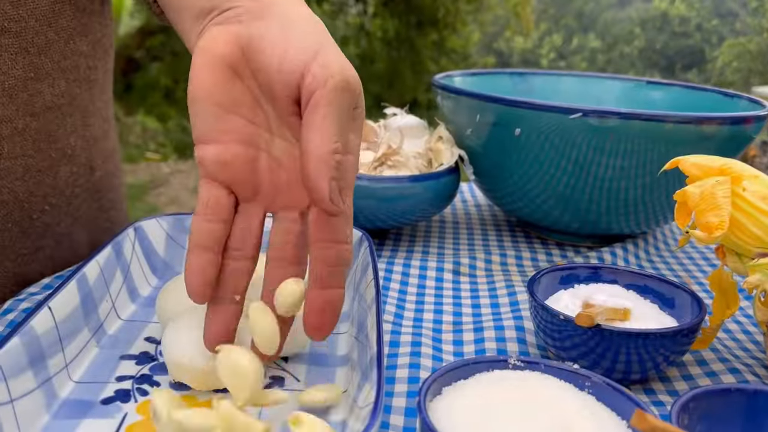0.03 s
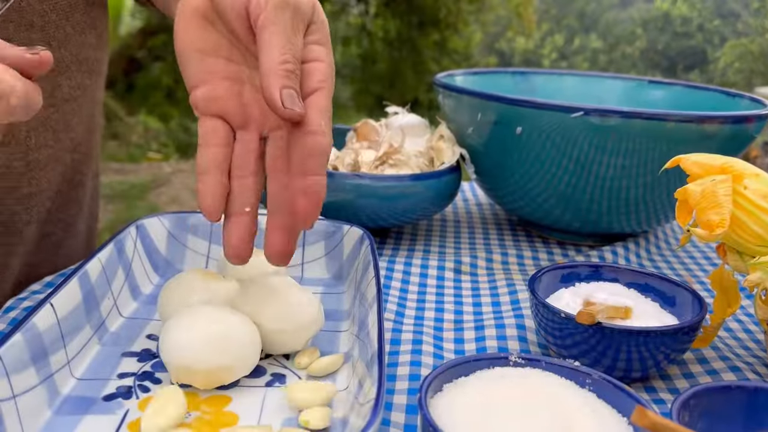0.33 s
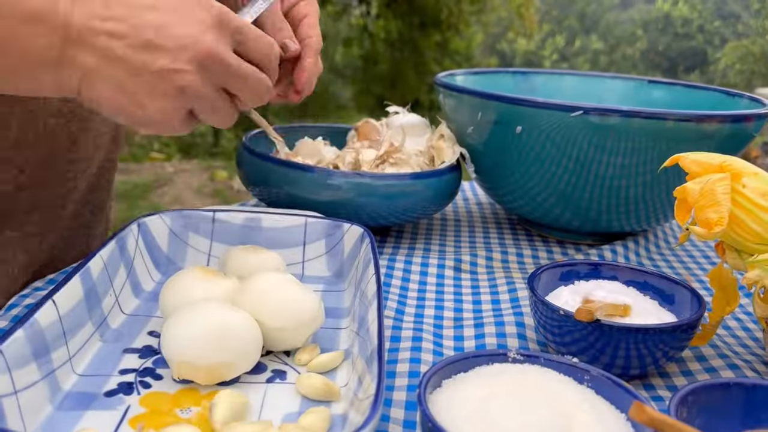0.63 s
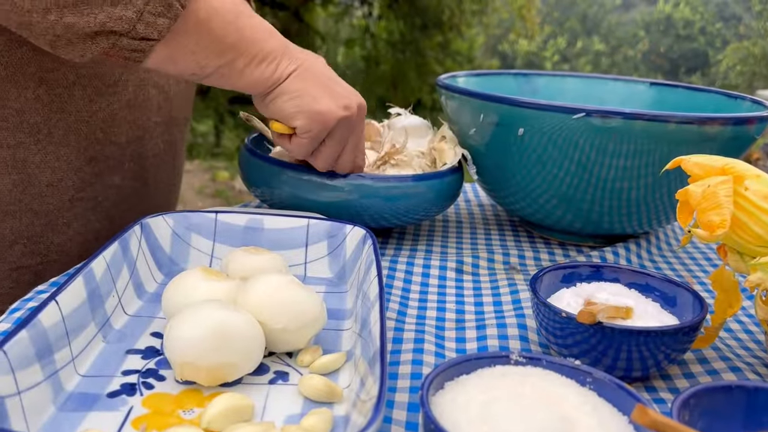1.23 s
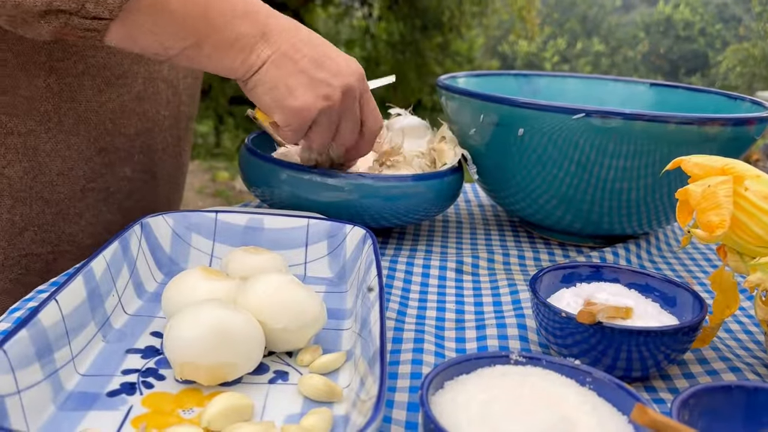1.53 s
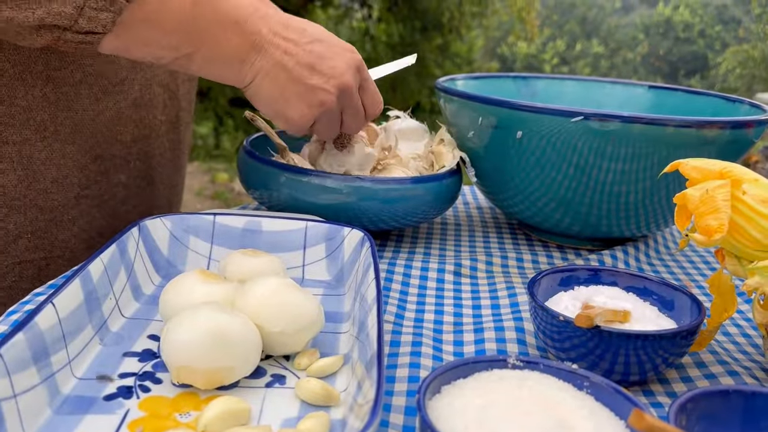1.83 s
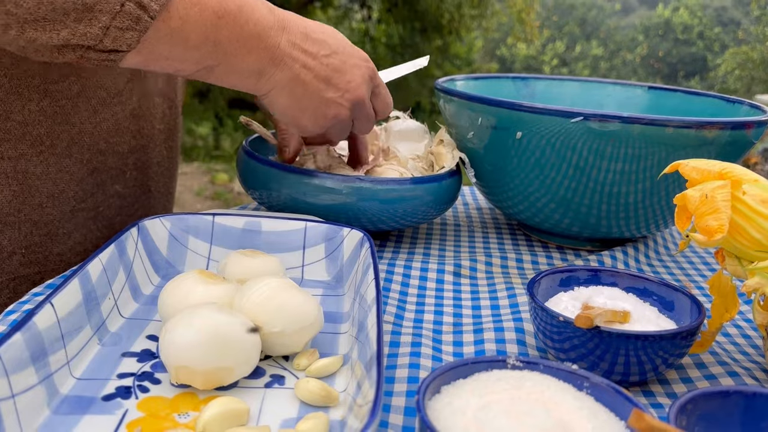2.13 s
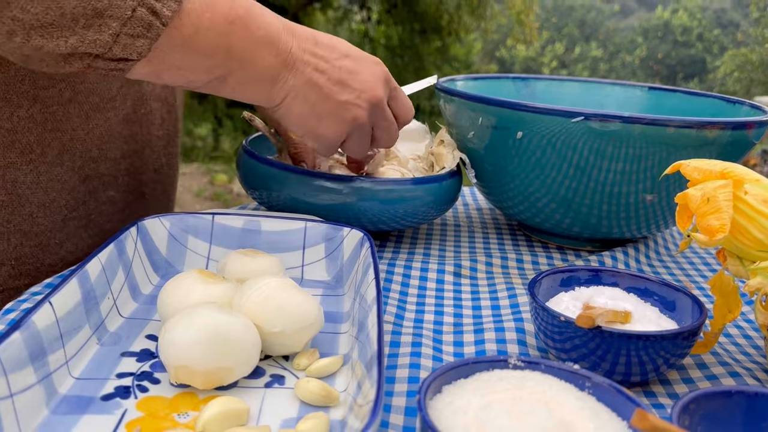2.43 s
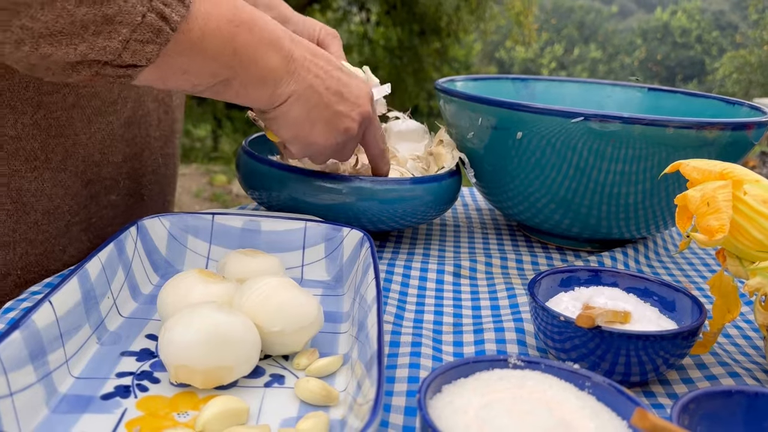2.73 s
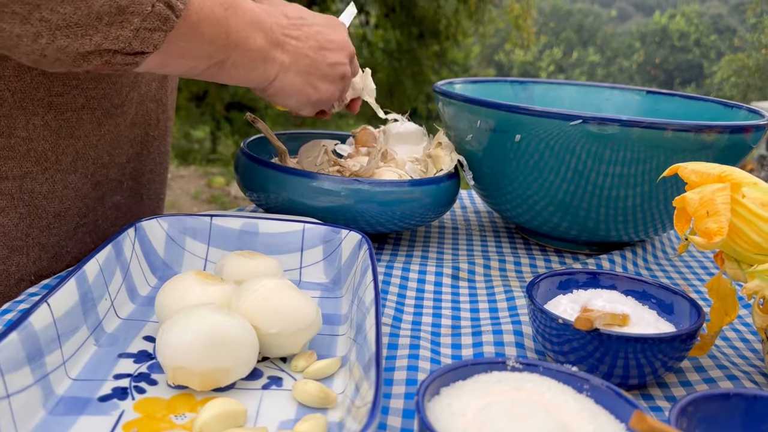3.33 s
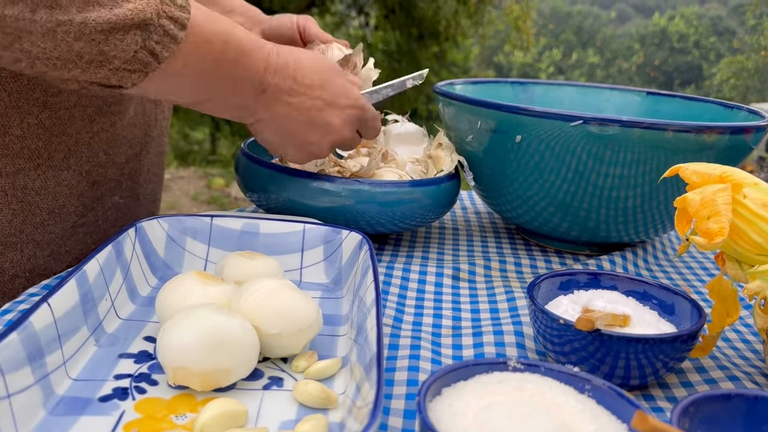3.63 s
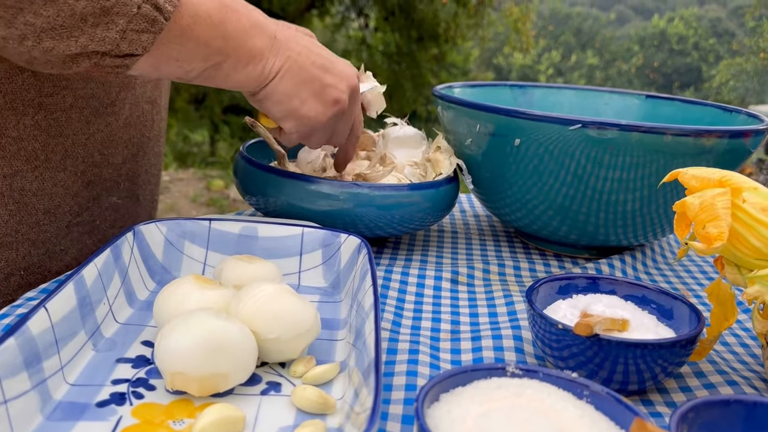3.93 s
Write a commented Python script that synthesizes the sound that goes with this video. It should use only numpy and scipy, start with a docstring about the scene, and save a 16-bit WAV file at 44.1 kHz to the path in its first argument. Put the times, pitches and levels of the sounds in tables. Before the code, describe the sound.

Dry garlic skins rustle and crackle close by, over a faint outdoor rumble and hiss. In the first 0.3 seconds, peeled cloves tumble into a ceramic dish with small thuds and clinks. From 1 second, a hand rummages through the skins, with snaps around 1.7 and soft bumps against the bowl. From 3.2 to 3.6, a bulb cracks apart in louder, dense crackles, ending with small hollow pops and light rustling.

```python
"""At an outdoor table, peeled garlic cloves tumble into a ceramic dish, each impact exciting its modes.
A hand rummages through dry skins in a bowl: friction makes them rustle, brittle fracture makes them snap,
and nudges set bowl and table vibrating. A papery bulb is then cracked apart in a run of fractures.
A close pair of microphone ports picks it all up, over a low outdoor rumble and a faint hiss of air."""
import sys
import numpy as np
from scipy import signal
from scipy.fft import rfft, irfft
from scipy.io import wavfile
from scipy.ndimage import uniform_filter1d

SR = 44100
rng = np.random.default_rng(int(sys.argv[2]) if len(sys.argv) > 2 else 0)


def waveform_to_disk(signal):
    """Save audio, clipped to [-1, 1], as 16-bit WAV at the path in sys.argv[1]."""
    frames = np.transpose(np.atleast_2d(signal))
    scaled = np.clip(frames, -1, 1) * 32767
    samples = np.round(scaled).astype(np.int16)
    wavfile.write(sys.argv[1], SR, samples)


N = 176400
TIME, BINS = np.arange(N) / SR, np.fft.rfftfreq(N, 1 / SR)

# Levels are relative. Spectra of the outdoor background: f/Hz, level/dB
RUMBLE_SPECTRUM = [(20, -43), (40, -13.5), (62, 0), (78, -5), (99, 1.5), (122, -8.5), (270, -19.5),
                   (600, -37), (2000, -97)]
AIR_SPECTRUM = [(100, 8.5), (600, 2.5), (1700, -5.5), (2600, -5), (4000, -12), (8400, -14), (10800, -37.5),
                (13500, -25)]
# Cloves landing: t/s, thud level/dB, dish level/dB
LANDINGS = [(0.0, -41, -51.5), (0.0212, -40, -59), (0.0293, -37, -67), (0.064, -38.5, -54),
            (0.084, -38, -48), (.113, -41, -62), (.136, -43.5, -56), (0.16, -42, -58.5), (.184, -39, -55),
            (.196, -42.5, -57), (.222, -48.5, -66), (0.268, -48.5, -78)]
# Spectrum of a landing: f/Hz, level/dB
LANDING_SPECTRUM = [(40, -16), (150, 4), (240, -8.5), (440, -3.5), (700, -13), (1100, -7), (1500, -16),
                    (2100, -20.5), (3200, -31), (6500, -28), (14000, -39)]
# Modes of the dish: f/Hz, level/dB, T60/s
DISH_MODES = [(1130, -10, .05), (1450, -7, 0.055), (1918, -18, 0.06), (3757, -1, 0.13), (5000, -7, 0.056),
              (6000, -10, 0.12)]
# Strokes of the hand: t/s, duration/s, level/dB, body offset/dB
HAND_STROKES = [(1.011, 0.091, -49, 2.5), (1.102, 0.14, -54, 3.5), (1.261, 0.044, -52.5, 9.5),
                (1.323, 0.17, -55.5, 2), (1.492, 0.17, -57, 5.5), (1.642, 0.11, -41, -9.5),
                (1.786, 0.08, -53, 0.5), (1.871, 0.14, -48, -4.5), (2.048, 0.026, -53.5, -3),
                (2.103, 0.12, -51, -6.5), (2.237, 0.09, -53.5, -10), (2.305, 0.085, -49.5, -0.5),
                (2.413, 0.05, -54, 0), (2.479, 0.094, -51, -1.5), (2.62, 0.031, -55.5, 0),
                (2.689, 0.093, -55, 0), (3, 0.11, -55.5, -1.5), (3.118, 0.11, -62.5, -4),
                (3.594, 0.066, -55, -2), (3.687, 0.14, -55, 0), (3.857, 0.11, -63.5, 0.5)]
# Spectra of the rustle's two bands: f/Hz, level/dB
BODY_SPECTRUM = [(100, -18), (400, 0.5), (760, 9), (1150, 3), (1850, 0.5), (2300, -3), (3100, -1),
                 (5000, -3), (7000, -8), (16000, -7)]
TREBLE_SPECTRUM = [(500, -52), (3000, -7.5), (6000, -2), (8600, -0.5), (11000, -3), (15700, -0.5)]
# Modes of the bowl: f/Hz, level/dB, T60/s
BOWL_MODES = [(813, -1.5, 0.33), (1820, -27, 0.11), (2030, -7.5, 0.071), (3310, -14, 0.096)]
# Single skins snapping: t/s, crack level/dB, flake level/dB
SKIN_SNAPS = [(1.056, -50, -40), (1.4023, -33, -59), (1.562, -36.5, -52), (1.6356, -28.5, -52),
              (1.6445, -25.5, -43), (1.674, -26, -35.5), (1.6816, -17.5, -27.5), (1.7173, -18, -37.5),
              (1.726, -37, -36), (1.7385, -26, -34.5), (1.7477, -37, -39), (1.838, -21.5, -44),
              (1.8544, -31, -44), (1.9355, -27.5, -55), (1.9426, -27, -37), (1.961, -30.5, -63),
              (2.257, -43, -55), (2.4997, -27.5, -51.5), (2.5997, -29.5, -55), (2.6749, -35, -53.5),
              (2.9192, -55, -53.5), (3.2325, -31, -64), (3.243, -27.5, -29.5), (3.2734, -34, -45),
              (3.2796, -16, -36), (3.283, -15, -21), (3.2848, -16.5, -34.5), (3.2982, -33, -25),
              (3.31, -31, -35), (3.3165, -25, -32), (3.3189, -18, -31), (3.326, -26, -35.5),
              (3.3405, -21, -24.5), (3.3449, -22, -27), (3.3859, -22.5, -52), (3.395, -17, -44),
              (3.4002, -22, -47.5), (3.4287, -17.5, -36), (3.4617, -15, -27.5), (3.4643, -21.5, -36.5),
              (3.4777, -31, -26.5), (3.5019, -36, -29), (3.5059, -36, -29), (3.5115, -31, -27),
              (3.5159, -40, -38), (3.5564, -23, -30), (3.5646, -24, -32), (3.584, -29, -24.5),
              (3.7531, -38, -47)]
# Spectra of a crack and of its ringing flake: f/Hz, level/dB
CRACK_SPECTRUM = [(500, -29.5), (4000, -27), (6500, -4), (9500, -4.5), (11000, 1.5), (14000, -3),
                  (16000, -3.5)]
FLAKE_SPECTRUM = [(150, -23), (700, -11.5), (1200, -11.5), (1800, -10.5), (2450, -7.5), (3000, -3.5),
                  (4500, -4), (6000, -6), (9500, -6), (16000, -43)]
# Main resonance of the breaking skin: t/s, f/Hz
SKIN_RESONANCE = [(2.5, 4800), (2.9, 3130), (3.36, 3150), (3.48, 4150)]
# The hand bumping the bowl: t/s, thud level/dB, knock level/dB, ring level/dB
BOWL_NUDGES = [(1.122, -39, -70, -54), (1.225, -32.5, -70, -56.5), (1.45, -31, -47.5, -75),
               (1.622, -26, -46, -68), (1.9962, -30.5, -30.5, -48.5), (2.12, -32, -62, -53.5),
               (2.264, -33, -66, -75), (2.32, -56, -49, -49.5), (3.72, -45, -80, -53.5)]
# Modes of the table's thud and of the cushioned knock: f/Hz, level/dB, T60/s
TABLE_MODES = [(62, -0.57, 0.21), (78.9, 1.3, 0.14), (109.6, -2, 0.14)]
KNOCK_MODES = [(153.5, 3, 0.1), (184.5, 4.5, 0.11), (300, -4, 0.086), (396, -4.5, 0.058),
               (710, -2.5, 0.029)]
# Cloves shifting: t/s, level/dB
CLOVE_POPS = [(1.303, -37), (2.65, -40), (3.069, -46.5), (3.316, -39.5), (3.566, -32), (3.575, -34),
              (3.5822, -21.5), (3.591, -36.5), (3.6009, -25)]
# Modes of a hollow pop: f/Hz, level/dB, T60/s
POP_MODES = [(562, -39, 0.09), (716, -14, 0.039), (795, -4.5, 0.03)]
# Envelope of the tearing husk: t/s, crackle level/dB, body level/dB
TEAR_ENVELOPE = [(3.256, -52, -55), (3.285, -49, -56), (3.305, -47, -45), (3.34, -44, -48),
                 (3.365, -41.5, -47.5), (3.395, -44, -45), (3.445, -45, -50.5), (3.463, -38, -40),
                 (3.51, -41, -38.5), (3.535, -39.5, -44.5), (3.567, -36.5, -34.5), (3.595, -43, -38),
                 (3.625, -60, -62.5)]
# Left port against right: f/Hz, phase lead/rad
PORT_LEAD = [(100, 0.1), (800, 0.9), (1300, 2.7), (1580, 2.9), (1950, 0.5), (6500, 0.7), (7700, 3.1),
             (8050, 6), (9200, 5.7), (10700, 3.5), (12000, 2.8), (14000, 0.1), (16000, -0.5)]
# Left port against right: f/Hz, level difference/dB
PORT_LEVEL = [(100, 0), (400, 0.5), (1050, 7.5), (1550, -4), (1850, 0.5), (5700, 5), (6800, 0), (7700, 7.5),
              (8300, 0), (11000, 0)]
# Scattered against direct sound: f/Hz, level/dB
SCATTER_SPECTRUM = [(100, -14), (800, -12), (2000, 4), (4500, -6), (9000, -5), (11200, -22), (13500, -4)]


def amp(db):
    """Amplitude ratio of a level in decibels."""
    return 10 ** (np.asarray(db) / 20)


def unit(x):
    """Normalisation to rms 1."""
    return x / np.sqrt(np.mean(x ** 2) + 1e-20)


def read(points, hz):
    """Interpolation along a log-frequency axis."""
    f, value = np.transpose(points)
    return np.interp(np.log(hz + 1), np.log(f + 1), value)


def add(mix, start, sound):
    """Superposition of a sound on the mix from a given time."""
    part = mix[max(round(start * SR), 0):][:len(sound)]
    part += sound[:len(part)]


def colour(x, spectrum):
    """Minimum-phase filtering that preserves the power of white noise."""
    hz = abs(np.fft.fftfreq(4096, 1 / SR))
    log_gain = np.log(unit(amp(read(spectrum, hz))))
    taps = np.fft.ifft(np.exp(np.conj(signal.hilbert(log_gain)))).real
    return signal.oaconvolve(x, taps)[:N]


def ring(modes):
    """Free vibration: a sum of exponentially damped modes."""
    t = TIME[:SR // 2]
    return sum(amp(db - 60 * t / t60) * np.sin(2 * np.pi * hz * t) for hz, db, t60 in modes)


def burst(envelope):
    """Amplitude-modulated noise with the energy of its envelope."""
    return unit(envelope * rng.standard_normal(len(envelope))) * np.sqrt(np.mean(envelope ** 2))


def outdoors(spectrum, db, side_gain):
    """Stationary background noise, partly coherent between the two ports."""
    gain = amp(read(spectrum, BINS))
    mid, side = (unit(irfft(rfft(rng.standard_normal(N)) * gain, N)) for _ in range(2))
    return amp(db) * unit(np.array([mid + side_gain * side, mid - side_gain * side]))


def falling_cloves(contact_s=0.000093, scuff_s=0.012, spread_db=2):
    """Impact: a moist clove thuds and scuffs; the point struck sets the strength of each dish mode."""
    thuds, dish = np.zeros((2, N))
    t = TIME[:SR // 5]
    push = amp(0.5) * t / contact_s * np.exp(1 - t / contact_s)
    for start, thud_db, dish_db in LANDINGS:
        scuff = burst(np.exp(-t / scuff_s))
        add(thuds, start, amp(thud_db) * (push + scuff))
        spot_db = spread_db * rng.uniform(-1.2, 1, len(DISH_MODES))
        modes = [(hz, db + shift, t60) for (hz, db, t60), shift in zip(DISH_MODES, spot_db)]
        add(dish, start, amp(dish_db) * ring(modes))
    return colour(thuds, LANDING_SPECTRUM) + dish


def crackle(per_s, spread_db, grain_s=0.00035):
    """A Poisson process of tiny fractures, each a puff of noise, most small and a few large."""
    size = amp(spread_db * np.minimum(rng.exponential(1, N), 5))
    fractures = size * (rng.random(N) < per_s / SR)
    puff = np.exp(-((TIME[:256] - TIME[128]) / grain_s) ** 2)
    power = np.convolve(fractures ** 2, puff, "same")
    return unit(np.sqrt(power) * rng.standard_normal(N))


def crinkle(x, depth_db=3, width_hz=900, hold_s=0.025):
    """Resonance depends on shape: as skins crumple, spectral peaks come and go."""
    hz, t, spectra = signal.stft(x, SR, nperseg=256)
    ripple = uniform_filter1d(rng.standard_normal(spectra.shape), round(width_hz / hz[1]), axis=0)
    ripple = uniform_filter1d(ripple, round(hold_s / t[1]), axis=1)
    _, crinkled = signal.istft(spectra * amp(depth_db * unit(ripple)), SR, nperseg=256)
    return unit(crinkled[:N])


def rustle(rise_s=0.018, fall_s=0.019, sag_db=1):
    """Friction: each stroke rubs many skins together and drives the bowl into faint resonance."""
    treble_envelope, body_envelope = np.zeros((2, N))
    for start, length, db, body_db in HAND_STROKES:
        t = np.maximum(TIME - start, 0)
        push = np.minimum(t / rise_s, 1) * np.exp(-np.maximum(t - length, 0) / fall_s)
        push *= amp(db - sag_db * np.minimum(t / length, 1))
        treble_envelope = np.hypot(treble_envelope, push)  # incoherent sources add in power
        body_envelope = np.hypot(body_envelope, push * amp(body_db))
    grains = crinkle(crackle(per_s=1700, spread_db=3))
    rub = crinkle(crackle(per_s=1700, spread_db=0.5))
    treble = colour(treble_envelope * grains, TREBLE_SPECTRUM)
    body = amp(-5) * colour(body_envelope * rub, BODY_SPECTRUM)
    bowl = amp(-53.5) * signal.oaconvolve(body, ring(BOWL_MODES))[:N]
    return treble + body + bowl


def skin(x, bandwidth_hz=800):
    """Forced response of a papery skin: a broad hump with one moving resonance."""
    broad = colour(x, FLAKE_SPECTRUM)
    centre_hz = np.interp(TIME, *np.transpose(SKIN_RESONANCE))
    carrier = np.exp(2j * np.pi * np.cumsum(centre_hz) / SR)
    pole = np.exp(-np.pi * bandwidth_hz / SR)
    # Shifting down, low-passing and shifting back makes a moving band-pass.
    resonance = (carrier * signal.lfilter([1 - pole], [1, -pole], broad / carrier)).real
    return amp(-6) * broad + amp(4) * resonance


def snaps(width_s=0.00057, lead_s=0.0021, tail_s=0.0031):
    """Brittle fracture of a skin: a very brief swell of noise, a sharp crack, then a short papery ring."""
    t = TIME[:SR // 25] - 0.01  # zero at the break
    fracture = np.exp(-abs(t) / width_s)
    skirt = np.exp(-abs(t) / np.where(t < 0, lead_s, tail_s))
    crack, flake = np.zeros((2, N))
    for moment, crack_db, flake_db in SKIN_SNAPS:
        add(crack, moment + t[0], amp(crack_db - 3.5) * burst(fracture + amp(-18.5) * skirt))
        add(flake, moment + t[0], amp(flake_db + 1.5) * burst(fracture + amp(-14.5) * skirt))
    return colour(crack, CRACK_SPECTRUM) + skin(flake)


def nudges(thud_rise_s=0.012, knock_rise_s=0.0044):
    """Cushioned impact: the bowl rocks on the cloth with a knock, a short ring and a thud in the table."""
    out, t = np.zeros(N), TIME[:SR // 2]
    thud = ring(TABLE_MODES) * (1 - np.exp(-t / thud_rise_s))
    knock = ring(KNOCK_MODES) * (1 - np.exp(-t / knock_rise_s))
    bowl = ring(BOWL_MODES)
    for start, thud_db, knock_db, ring_db in BOWL_NUDGES:
        add(out, start, amp(thud_db) * thud + amp(knock_db) * knock + amp(ring_db) * bowl)
    return out


def pops():
    """Heavily damped modes give a hollow pop as a clove shifts or comes loose."""
    out = np.zeros(N)
    for start, db in CLOVE_POPS:
        add(out, start, amp(db) * ring(POP_MODES))
    return out


def tear(per_s=1900, spread_db=2.5):
    """Crack propagation: the husk of the bulb rips in a dense run of fractures that excite the skin."""
    times, crack_db, body_db = np.transpose(TEAR_ENVELOPE)
    envelopes = (amp(np.interp(TIME, times, db, -np.inf, -np.inf)) for db in (crack_db, body_db))
    crack, body = (envelope * crackle(per_s, spread_db) for envelope in envelopes)
    return colour(crack, CRACK_SPECTRUM) + skin(body)


def ports(x, scatter_t60_s=0.02):
    """Interference: sound reaches two ports at unequal phase and level, with scatter from the crockery."""
    left = amp(read(PORT_LEVEL, BINS) / 2) * np.exp(0.5j * read(PORT_LEAD, BINS))
    direct = rfft(x, N) * np.array([left, 1 / left])
    t = TIME[:SR // 10]
    echoes = rng.standard_normal((2, len(t))) * amp(-60 * t / scatter_t60_s) * (t > 0.0005)
    echoes /= np.linalg.norm(echoes, axis=1, keepdims=True)
    scatter = amp(read(SCATTER_SPECTRUM, BINS)) * rfft(echoes, N)
    return irfft(direct * (1 + scatter), N)


def scene():
    """Superposition of the sources on the table and the outdoor background."""
    rumble = outdoors(RUMBLE_SPECTRUM, db=-50, side_gain=0.064)
    air = outdoors(AIR_SPECTRUM, db=-59.5, side_gain=0.96)
    near = falling_cloves() + rustle() + snaps() + nudges() + pops() + tear()
    return rumble + air + ports(near)


def record(dry):
    """Band limiting by a linear-phase low-pass filter."""
    cutoff_hz = 16050
    taps = signal.firwin(255, cutoff_hz, window=("kaiser", 9), fs=SR)
    return signal.oaconvolve(dry, taps[None], "same")


dry = scene()
out = record(dry)
waveform_to_disk(out)
```